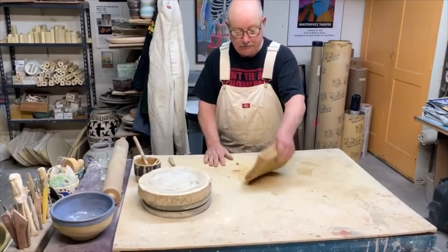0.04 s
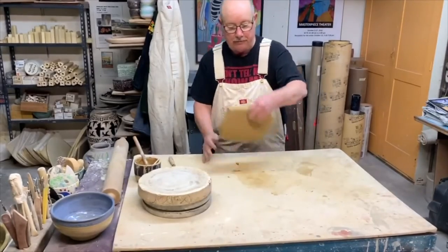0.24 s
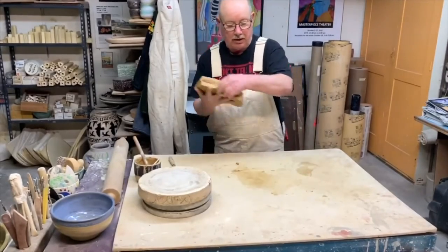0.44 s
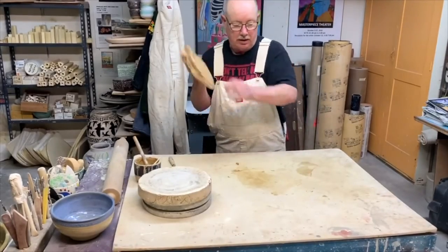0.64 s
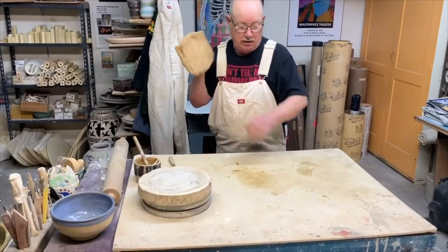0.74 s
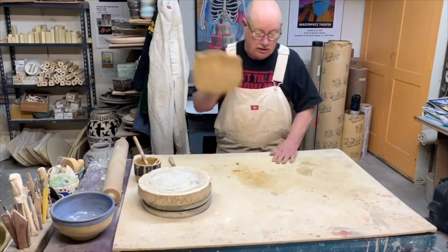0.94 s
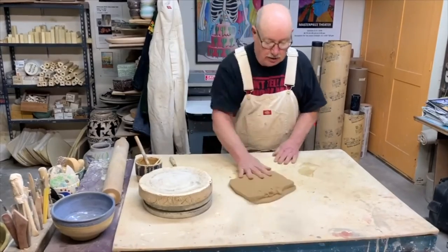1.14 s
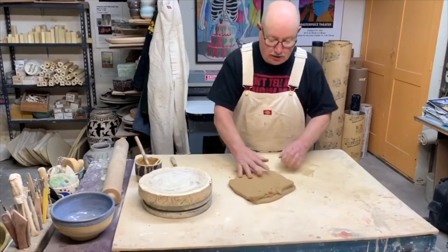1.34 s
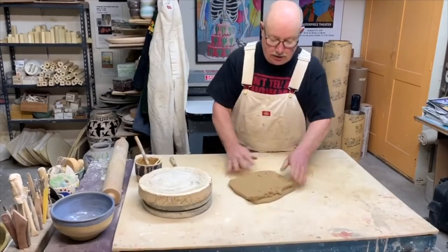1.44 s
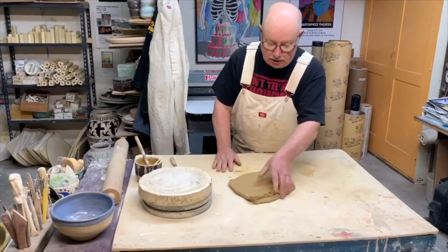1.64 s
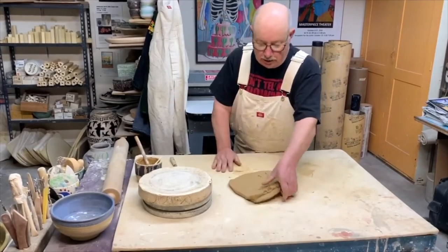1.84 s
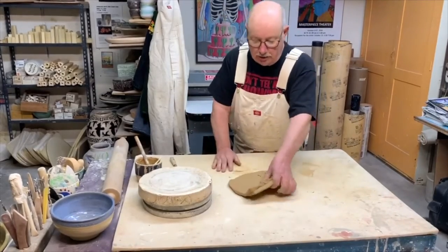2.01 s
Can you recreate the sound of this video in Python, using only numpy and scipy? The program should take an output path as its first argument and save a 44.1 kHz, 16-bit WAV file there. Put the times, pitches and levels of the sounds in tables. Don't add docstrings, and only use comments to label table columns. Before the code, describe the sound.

Wet clay slab slammed onto a wooden worktable, after a lighter hand catch and soft rustles

```python
import sys
import numpy as np
from scipy import signal
from scipy.fft import rfft, irfft
from scipy.io import wavfile

SR = 44100
rng = np.random.default_rng(int(sys.argv[2]) if len(sys.argv) > 2 else 0)


def wav_out(sig):
    wavfile.write(sys.argv[1], SR, np.round(np.clip(np.atleast_2d(sig).T, -1, 1) * 32767).astype(np.int16))


def undo_db(level):
    steps = np.asarray(level, float) / 20
    return 10 ** steps


N = 91375


def unit(x):
    return x / np.sqrt(np.mean(x ** 2) + 1e-20)


def at_hz(points, hz):
    points_hz, values = np.transpose(points)
    return np.interp(np.log(hz), np.log(points_hz), values)


def cut(x, hz, kind, order=2):
    sos = signal.butter(order, min(hz, 0.45 * SR), kind, fs=SR, output="sos")
    return signal.sosfilt(sos, x)


def ring(push, hz, t60):
    radius = undo_db(-60 / (t60 * SR))
    turn = 2 * np.pi * hz / SR
    return signal.lfilter([0, np.sin(turn)], [1, -2 * radius * np.cos(turn), radius ** 2], push + 1e-18)


def click(s):
    return np.maximum(1 - np.abs(np.arange(N) - s * SR), 0)


def colour(x, spectrum):
    hz = np.maximum(np.arange(N // 2 + 1) * SR / N, 1)
    edge = np.minimum(hz / spectrum[0][0], 1) ** 2
    return unit(irfft(rfft(x) * undo_db(at_hz(spectrum, hz)) * edge, N))


def gritty(grit_db):
    grain = 22
    grain_db = grit_db * np.minimum(rng.exponential(1, N // grain + 1), 5)
    sizes = np.repeat(undo_db(grain_db), grain)[:N]
    return unit(sizes * rng.standard_normal(N))


def swell(start, rise, t60):
    t = np.arange(N) / SR - start
    return np.clip(t / rise, 0, 1) ** 2 * undo_db(-60 * np.clip(t - rise, 0, 9) / t60)


def sides(mid, side, hz):
    # frequency in Hz, left-right likeness from 0 to 1.
    likeness = [(60, 0.98), (150, 0.97), (300, 0.38), (700, 0.083), (2000, 0.17), (6000, .1)]
    alike = np.clip(at_hz(likeness, hz), 0, 1)
    spread = np.sqrt(1 - alike) * side * [[1], [-1]]
    return (np.sqrt(1 + alike) * mid + spread) / np.sqrt(2)


def floor():
    # frequency in Hz, level in dB per Hz.
    tone = [(30, -15.5), (70, 3), (130, -3), (420, -13.5), (1500, -22.5), (3500, -29), (16000, -29.5)]
    hz = np.maximum(np.arange(N // 2 + 1) * SR / N, 1)
    mid, side = [rfft(colour(rng.standard_normal(N), tone)) for _ in range(2)]
    return undo_db(-70) * irfft(sides(mid, side, hz), N)


def rustles():
    # start in seconds, rise in seconds, fall t60 in seconds, level in dB, top in Hz.
    brushes = [(0.038, 0.057, 0.11, -67.5, 840), (0.385, 0.005, 0.25, -65, 1180),
               (0.408, 0.0085, 0.2, -69.5, 576), (0.475, 0.024, 0.023, -55.5, 3030),
               (0.5025, 0.0059, 0.079, -45.5, 4480), (.63, 0.078, 0.66, -67.5, 3100),
               (0.742, 0.02, 0.25, -60.5, 1498), (0.751, 0.03, 0.22, -65, 3900),
               (0.919, 0.013, 0.24, -61.5, 3160), (0.971, 0.016, 0.32, -73.5, 2300),
               (1.061, 0.011, 0.14, -69.5, 1210), (1.579, 0.013, 0.31, -65.5, 3970),
               (1.585, 0.032, 0.41, -66, 15000), (1.645, 0.03, 0.15, -59.5, 2900),
               (1.648, 0.017, 0.14, -58, 15200), (1.793, 0.0046, 0.79, -63.5, 1517),
               (1.888, 0.062, 0.25, -56.5, 2510), (1.9382, 0.00097, 0.034, -42, 4560),
               (1.949, 0.017, 0.14, -66, 1084)]
    noise = cut(gritty(grit_db=1.2), 196, "high")
    out = 0
    for s, rise, t60, db, top_hz in brushes:
        out = out + undo_db(db) * swell(s, rise, t60) * unit(cut(noise, top_hz, "low"))
    return out


def smacks():
    # time in seconds, crack level in dB, air pocket in Hz, pocket level in dB, pocket t60 in seconds.
    hits = [(0.055, -48, 1380, -61, 0.01), (0.3864, -75, 1290, -52, 0.007),
            (.923, -66, 3000, -59.5, 0.0044), (.931, -68, 3320, -60.5, .004), (.941, -62, 2500, -57, .004),
            (.5010, -31, 1870, -29.5, 0.02), (0.503, -22, 1224, -39, 0.03),
            (0.503, -28.5, 3000, -35.5, 0.011), (0.503, -28.5, 6520, -40, 0.013),
            (0.5047, -27, 5640, -44, 0.0086), (.508, -31, 1960, -39, 0.019),
            (.531, -49, 1982, -43.5, 0.075), (.5045, -30, 2042, -50, 0.16), (1.1417, -7, 1066, -15, 0.016),
            (1.1411, -13, 15000, -14.5, .004), (1.1515, -14.5, 14800, -18.5, .005),
            (1.151, -19.5, 3000, -22.5, 0.0052), (1.1576, -12, 1595, -1.5, 0.01),
            (1.158, -22, 6600, -14, 0.0055), (1.1629, -21, 6720, -11.5, 0.012),
            (1.1624, -13, 3560, -9.5, 0.0073), (1.1670, -28, 516.7, -10.5, 0.047),
            (1.7962, -77, 1365, -46, 0.017), (1.9389, -33.5, 1840, -37.5, 0.017),
            (1.9395, -38, 3500, -43.5, 0.0059), (1.9400, -44.5, 4100, -36, 0.0061),
            (1.9405, -36.5, 1834, -39, 0.013), (1.9395, -49, 2650, -51, 0.0066),
            (1.9419, -49, 888, -38.5, 0.05), (1.949, -55, 860, -39.5, 0.032)]
    crack_s, crack_low_hz = 0.00098, 4650
    noise = cut(rng.standard_normal(N), crack_low_hz, "high")
    cracks, clicks, pockets = 0, 0, 0
    for s, crack_db, hz, pocket_db, t60 in hits:
        cracks = cracks + undo_db(crack_db) * noise * swell(s, crack_s / 10, 4 * crack_s)
        clicks = clicks + undo_db(crack_db + 12.5) * click(s)
        pockets = pockets + undo_db(pocket_db) * ring(click(s), hz, t60)
    far = cut(clicks, 3000, "high") + undo_db(-3) * pockets
    return cracks + pockets, cut(far, 600, "high")


def thumps():
    # time in seconds, level in dB, frequency in Hz, t60 in seconds.
    knocks = [(.068, -42.5, 80, 0.078), (0.178, -69, 85, 0.22), (.42, -52, 90, 0.12),
              (.501, -44.5, 225, .07), (0.503, -52, 331.5, .06), (0.518, -44.5, 75, 0.065),
              (0.668, -64, 320, 0.17), (0.754, -66, 230.3, 0.3), (0.771, -57, 75, .2),
              (.935, -54.5, 100, .1), (.98, -57.5, 145.6, 0.22), (1.028, -48.5, 95, 0.18),
              (1.059, -57.5, 86, 0.072), (1.597, -56, 498, 0.071), (1.60, -54.5, 260, 0.2),
              (1.83, -46, 144, 0.2), (1.971, -47, 319.9, 0.06), (2.04, -44, 75, 0.038)]
    t = np.arange(N) / SR
    out = 0
    for s, db, hz, t60 in knocks:
        push = np.sin(np.pi * np.clip((t - s) * 2 * hz, 0, 1)) * 4 * hz / SR
        out = out + undo_db(db) * ring(push, hz, t60)
    return out


def rubs():
    # start in seconds, rise in seconds, fall t60 in seconds, level in dB, resonance in Hz.
    strokes = [(.64, .03, 0.51, -71.5, 1990), (.09, 0.026, 0.1, -75, 600), (.10, 0.032, .15, -69, 199),
               (.52, 0.027, 0.29, -62, 338.6), (0.654, .015, 0.15, -67, 350),
               (.70, 0.034, 0.23, -70.5, 1770), (.745, 0.017, 0.19, -60.5, 234.5),
               (0.747, 0.015, 0.21, -79, 650), (.75, 0.023, .25, -68.5, 1200),
               (.755, 0.018, 0.18, -70, 1720), (.79, 0.017, .15, -69, 1910), (.81, 0.012, 0.14, -71, 350),
               (1.6, 0.049, .25, -50, 135), (1.37, 0.049, 0.39, -46, 240.5), (.67, 0.034, 0.13, -62, 70.5),
               (1.58, 0.026, .2, -62, 369.8), (1.67, .03, 0.19, -62.5, 350),
               (1.67, 0.024, 0.28, -59.5, 212.7), (1.80, 0.026, 0.46, -66, 267),
               (1.93, 0.019, 0.22, -58.5, 416), (1.939, 0.024, .2, -60.5, 220),
               (1.92, 0.021, 0.21, -61.5, 304), (1.97, 0.031, 0.49, -57.5, 130.5),
               (2.01, 0.016, .3, -67, 838)]
    noise = rng.standard_normal(N)
    out = 0
    for s, rise, t60, db, hz in strokes:
        singing = unit(ring(noise, hz, 46 / hz))
        out = out + undo_db(db) * swell(s, rise, t60) * singing
    return out


def squelch():
    # frequency in Hz, level in dB per Hz.
    wet_spectrum = [(200, -3), (800, -19), (1650, -17), (2500, -23.5), (4000, -26), (7500, -27.5),
                    (11000, -32), (16000, -41.5)]
    air_start_s, first_contact_s, last_contact_s = 1.1244, 1.1425, 1.1628
    air_db, air_rise_db = -34.5, 24.5
    grit_level_db, grit_t60_s = -13.5, 0.1
    t = np.arange(N) / SR
    rising_db = air_db - air_rise_db * (first_contact_s - t) / (first_contact_s - air_start_s)
    rushing = (t > air_start_s) * (t < first_contact_s)
    breath = unit(cut(rng.standard_normal(N), 8000, "low", order=6))
    air = undo_db(np.minimum(rising_db, air_db)) * rushing * breath
    fall_db = -60 * np.maximum(t - last_contact_s, 0) / grit_t60_s
    held = (t >= first_contact_s) * undo_db(grit_level_db + fall_db)
    return air + held * colour(gritty(grit_db=2.5), wet_spectrum)


def slam(modes):
    # start in seconds, level in dB, contact in seconds.
    pushes = [
        (1.143, -13, 0.0039),
        (1.158, -5, 0.0019),
        (1.171, -8, 0.0024),
        (1.187, -6.5, 0.003),
    ]
    t = np.arange(N) / SR
    shapes = []
    for s, db, contact_s in pushes:
        half_sine = np.sin(np.pi * np.clip((t - s) / contact_s, 0, 1))
        shapes.append(undo_db(db) * half_sine / (contact_s * SR))
    out = 0
    for k, (hz, db, t60) in enumerate(modes):
        drive = rng.uniform(0.6, 1.4, len(pushes)) @ np.array(shapes)
        mode = undo_db(db) * ring(drive, hz, t60)
        out = out + sides(mode, mode * (-1) ** k, hz)
    return out


def table_top():
    # mode in Hz, level in dB, t60 in seconds.
    top_modes = [(71, -10.5, 0.056), (89.5, -15, 0.98), (126.6, -11.5, 0.23), (135, -8, 0.31),
                 (212.2, -9.5, 0.29), (236, -14, 0.28), (262, -12, 0.4), (292.9, -7.5, .3),
                 (342.6, -9, 0.28), (415, -10, 0.28), (515, -9, 0.17), (566, -10, 0.24), (690, -15, 0.16),
                 (950, -13, 0.13)]
    return slam(top_modes)


def frame():
    # mode in Hz, level in dB, t60 in seconds.
    frame_modes = [(55, -26.5, 1.1), (69.2, -27.5, 1.6), (76.9, -27, 1.3), (86, -25.5, 2.6),
                   (92.5, -28.5, 3.1), (98.7, -26.5, 2.5), (110, -35, 1.2), (124.6, -34, 1.5),
                   (131.95, -26.5, 1.5), (150.3, -35.5, 2.2), (179.4, -41, 0.9), (207.4, -28.5, 1),
                   (237, -33, 1.8), (350, -37, .7)]
    # time in seconds, level in dB.
    freedom = [
        (1.14, 6.5),
        (1.3, -1),
        (1.42, 2.5),
        (1.6, 1),
        (1.719, -1.5),
        (1.789, 1),
        (1.815, -6),
        (1.899, -1.5),
        (1.95, -5.5),
        (2.07, -4.5),
    ]
    free_db = np.interp(np.arange(N) / SR, *np.transpose(freedom))
    return undo_db(free_db) * slam(frame_modes)


def studio(x):
    # frequency in Hz, t60 in seconds.
    room_t60 = [(60, 1), (150, 0.73), (300, 0.49), (700, 0.47), (2000, 0.36), (5000, 0.36), (12000, 0.25)]
    # frequency in Hz, level in dB.
    room_db = [(60, -6.5), (150, -6.5), (300, 0), (600, 3), (2000, -1), (4500, -6), (8000, -4),
               (14000, -2.5)]
    delay_s, build_s = 0.0029, 0.0056
    t = np.arange(SR) / SR
    white = rng.standard_normal((2, 2, SR))
    edges = 45 * 2 ** np.arange(0, 8.7, 0.5)
    tail = 0
    for k, (low, high) in enumerate(zip(edges, edges[1:])):
        band = signal.butter(2, [low, high], "band", fs=SR, output="sos")
        mid, side = signal.sosfilt(band, white[k % 2])
        hz = np.sqrt(low * high)
        t60 = at_hz(room_t60, hz)
        fall = undo_db(at_hz(room_db, hz) - 60 * t / t60)
        even_energy = np.sqrt(2 * np.log(1000) / t60 / SR)
        tail = tail + fall * sides(mid, side, hz) * even_energy
    tail = tail * np.clip((t - delay_s) / build_s, 0, 1)
    return signal.fftconvolve(x[None], tail, axes=1)[:, :N]


def off_table(near):
    delay_s = 0.00032
    late = np.interp(np.arange(N) - delay_s * SR, np.arange(N), near)
    return undo_db(-13) * cut(late, 686, "high") * [[1], [-1]]


def scene():
    smack, smack_far = smacks()
    handling = thumps() + rustles() + rubs()
    wet = squelch()
    top = table_top()
    near = smack + wet + handling
    direct = undo_db(-1) * near + off_table(near)
    far = smack_far + wet + undo_db(-4) * handling + top.mean(axis=0)
    return direct + top + studio(far) + frame() + floor()


def roll_off(x):
    return signal.sosfilt(signal.butter(12, 16990, fs=SR, output="sos"), x)


def record(dry):
    port_from_hz, in_step_hz, lag_s, least_turn = 4400, 6300, 0.000213, 1.4
    lift_hz, lift_db = 14900, 2
    peak = 1.05
    hz = np.arange(N // 2 + 1) * SR / N
    lift = undo_db(lift_db / (1 + (lift_hz / (hz + 1)) ** 10))
    left, right = rfft(dry) * lift
    share = 1 / (1 + (port_from_hz / (hz + 1)) ** 20)
    turn = np.maximum(2 * np.pi * (hz - in_step_hz) * lag_s, least_turn)
    right = np.sqrt(1 - share) * right + np.sqrt(share) * left * np.exp(1j * turn)
    x = cut(irfft(np.array([left, right]), N), 62, "high", order=4)
    rounded = peak * np.tanh(x / peak)
    top_cut = signal.cheby2(12, 70, 16900, fs=SR, output="sos")
    return roll_off(signal.sosfilt(top_cut, rounded))


dry = scene()
out = record(dry)
wav_out(out)
```